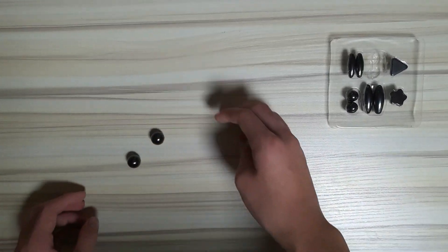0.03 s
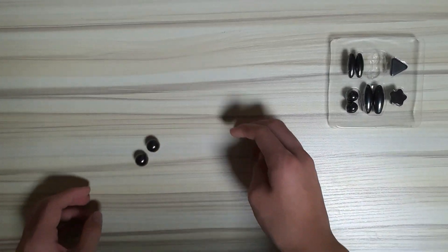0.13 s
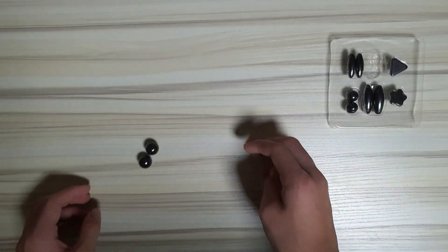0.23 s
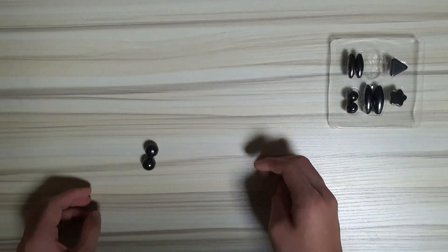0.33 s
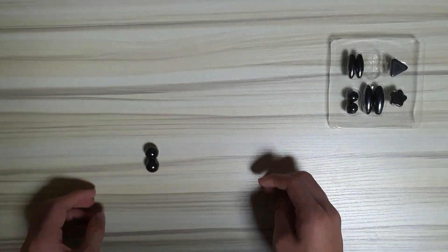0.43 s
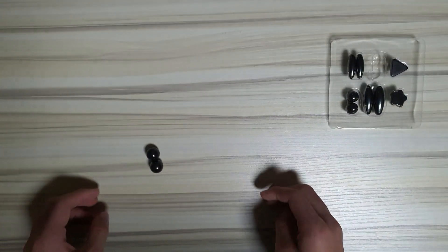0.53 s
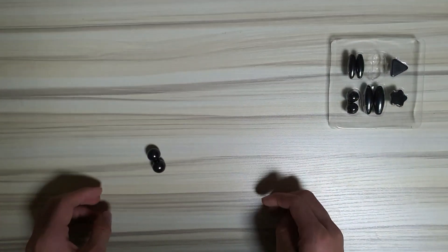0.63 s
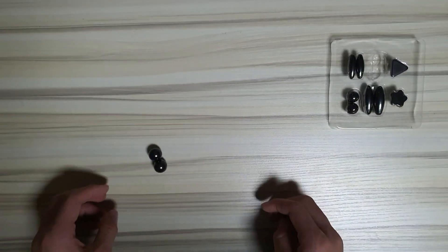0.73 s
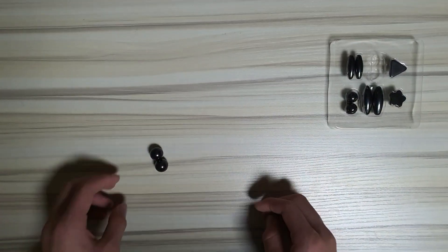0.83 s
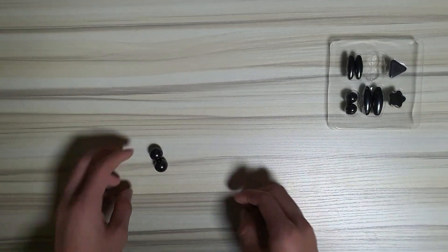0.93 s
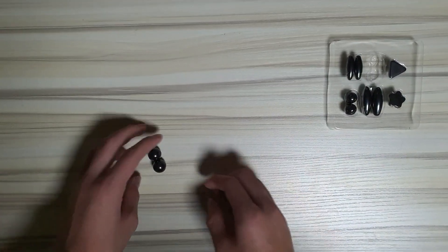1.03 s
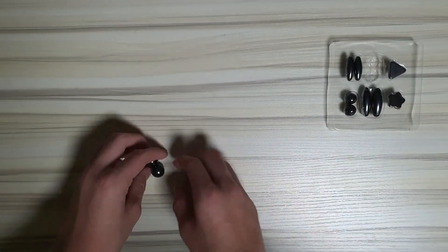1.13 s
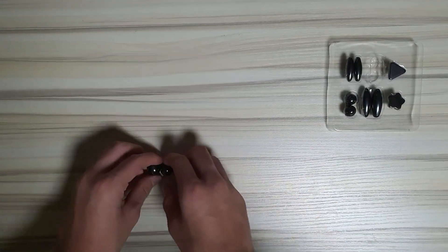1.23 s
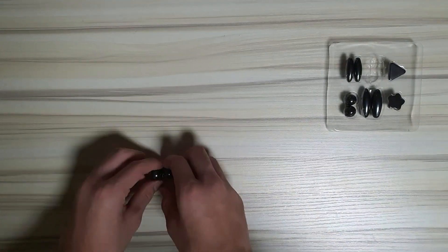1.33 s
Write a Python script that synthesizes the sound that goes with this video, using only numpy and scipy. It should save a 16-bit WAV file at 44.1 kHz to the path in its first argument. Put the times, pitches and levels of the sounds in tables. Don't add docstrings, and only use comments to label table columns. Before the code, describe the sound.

Magnet rattle on wood, closely heard in a small quiet room: low rolling rumble, crisp clicks accelerating to a buzzing chatter, sudden stop, faint hiss, then soft finger scrape, small ticks and dull knocks.

```python
import sys
import numpy as np
from scipy import signal
from scipy.fft import rfft, irfft
from scipy.io import wavfile

SR = 44100
rng = np.random.default_rng(int(sys.argv[2]) if len(sys.argv) > 2 else 0)


def bounce(signal):
    frames = np.transpose(np.atleast_2d(signal))
    limited = np.clip(frames, -1, 1)
    pcm = np.round(limited * 32767).astype(np.int16)
    wavfile.write(sys.argv[1], SR, pcm)


def magnitude_from_level(level_db):
    exponent = np.asarray(level_db, float) / 20
    return 10 ** exponent


N = 61740
TIME = np.arange(N) / SR

# time in seconds, level in dB.
THUMPS = [
    (.043, -33.5),
    (.168, -40),
    (1.229, -43),
    (1.243, -44),
    (1.3015, -36),
    (1.3065, -40.5),
    (1.3145, -34),
    (1.3205, -37),
    (1.3265, -35.5),
]


def evened(x):
    return x / np.sqrt(np.mean(x ** 2) + 1e-20)


def read(points, hz):
    f, value = np.transpose(points)
    return np.interp(np.log(hz + 1), np.log(f + 1), value)


def follow(curve):
    s, db = np.transpose(curve)
    return magnitude_from_level(np.interp(TIME, s, db))


def colour(x, points):
    hz = np.fft.rfftfreq(N, 1 / SR)
    return irfft(rfft(x) * magnitude_from_level(read(points, hz)), N)


def ring(x, hz, width):
    r = np.exp(-np.pi * width / SR)
    return 2 * signal.lfilter([1 - r], [1, -r * np.exp(2j * np.pi * hz / SR)], x)


def dying_tones(rows, t):
    return sum(magnitude_from_level(db) * np.exp(-np.pi * width * t) * np.sin(2 * np.pi * hz * t) for hz, width, db in rows)


def grit(per_s, spread_db):
    size = magnitude_from_level(spread_db * np.minimum(rng.exponential(1, (2, N)), 5)) * rng.standard_normal((2, N))
    return evened(size * (rng.random((2, N)) < per_s / SR))


def train(rows):
    s, db = np.transpose(rows)
    out = np.zeros(N)
    out[np.round(s * SR).astype(int)] = magnitude_from_level(db)
    return out


def room(x):
    # pitch in Hz, seconds to die by 60 dB.
    decay = [(200, 0.32), (1000, 0.34), (3500, .24), (7500, 0.28), (10000, .28), (12500, 0.16),
             (16000, 0.28)]
    taps = np.zeros((2, SR // 2))
    slots = np.arange(120, SR // 2 - 10, 10)
    at = slots + rng.integers(0, 10, (2, len(slots)))
    np.put_along_axis(taps, at, rng.choice([-1., 1.], at.shape), 1)
    hz, t, z = signal.stft(taps, SR, nperseg=256)
    fade = magnitude_from_level(-60 * t / read(decay, hz)[:, None])
    tail = signal.istft(z * fade, SR, nperseg=256)[1]
    return signal.fftconvolve(x, tail / np.linalg.norm(tail[0]), axes=1)[:, :N]


def hush():
    # pitch in Hz, level in dB.
    spectrum = [(40, -7.5), (200, -8), (600, -18), (1200, -14.5), (2300, -29.5), (3500, -26), (5000, -33),
                (16000, -40.5)]
    level_db = -76.5
    a = rng.standard_normal((2, N))
    return magnitude_from_level(level_db) * evened(colour(a + 0.23 * a[::-1], spectrum))


def fingers():
    # time in seconds, level in dB.
    slide = [(1.12, -100), (1.192, -91.5), (1.23, -50), (1.244, -50.5), (1.292, -59.5), (1.322, -60.5),
             (1.346, -69.5), (1.4, -83)]
    # pitch in Hz, level in dB.
    skin = [(880, -28), (1500, -20), (1920, 2), (3090, 6.5), (3590, -1.5), (4590, -1.5), (7540, -4),
            (13000, -26)]
    slips_per_s, level_db, start_s = 2500, 3.5, 1.12
    slips = grit(slips_per_s, 2.5) + .9 * rng.standard_normal((2, N))
    slips = slips + 0.084 * slips[::-1]
    rub = evened(colour(slips, [(300, -29.5)] + list(skin)))
    return magnitude_from_level(level_db) * rub * follow(slide) * (TIME > start_s)


def grip():
    # time in seconds, level in dB.
    chatter = [
        (1.2288, -43),
        (1.2365, -43),
        (1.2445, -43),
        (1.2525, -45),
        (1.314, -44),
        (1.3205, -46),
    ]
    # pitch in Hz, width in Hz, level in dB.
    tick_tones = [(2200, 500, -3), (3100, 500, -4), (4600, 300, 0), (7000, 900, -7)]
    # pitch in Hz, width in Hz, level in dB.
    rap_tones = [(450, 350, -3.5), (900, 360, -3), (1510, 460, -9)]
    t = np.arange(2000) / SR
    thud = dying_tones([(84.7, 40, -12.5)], t)
    ticks = signal.oaconvolve(train(chatter), dying_tones(tick_tones, t))[:N]
    knocks = signal.oaconvolve(train(THUMPS[-5:]), thud + dying_tones(rap_tones, t))[:N]
    return ticks + room(ticks[None]) + knocks


def rolling_bumps(tracks):
    bumps_per_s, spread_db, smooth = 1500, 1.5, 1.2
    bumps = grit(bumps_per_s, spread_db)[:tracks]
    return evened(bumps + smooth * rng.standard_normal((tracks, N)))


def table(s, db):
    # pitch in Hz, width in Hz, level in dB, left-right phase in radians.
    top_modes = [(201, 7, -10, .1), (278, 22, -3, .2), (325, 25, -4, .2), (370, 28, -7, .2),
                 (523, 20, -4, .3), (556, 14, -8, .3), (690, 40, -10, .5), (780, 30, -10, .6),
                 (966, 26, 5, 1.9), (1275, 26, -6, 2.2), (1505, 28, -3, 1.4), (1800, 70, -13, .8),
                 (2150, 100, -11, .4), (2600, 200, -12, .3)]
    # dB rolling in, coming to rest, settled, carried off.
    spots = [(-12, 1, 7, -8), (-6.5, -2, -5.5, 3), (3.5, -4, -10.5, 2), (5.5, -1, -8, 3),
             (11.5, -5, -2.5, -1), (5.5, 2.5, 6, 10.5), (8.5, -5.8, -5.5, -0.5), (6.7, -8, -2.5, 5.5),
             (1, -7, -11, -2.5), (11.5, .1, -1, 8), (2.5, 11.5, -10, 3.2), (-10, 1.8, -2, -21),
             (-1.5, 12, -6.5, 0.3), (-11, 15, -6, 1.5)]
    moves_s = [
        .17,
        .23,
        .59,
        .635,
        .69,
        1.1,
        1.2,
    ]
    # time in seconds, level in dB.
    roll = [(0, -41.5), (.12, -41.5), (.2, -32.5), (.235, -28.5), (.46, -26.5), (.55, -31.5), (.65, -27.5),
            (.69, -47.5), (.78, -69), (.9, -83), (1.1, -89), (1.13, -76.5), (1.2, -57.5), (1.227, -57),
            (1.229, -42.5), (1.278, -46.5), (1.318, -32), (1.345, -39), (1.4, -41)]
    # pitch in Hz, level in dB.
    wood = [(40, -32), (170, -31.5), (230, -19), (1000, -20.5), (2000, -18), (3500, -39), (8000, -50.5),
            (16000, -70.5)]
    # pitch in Hz, likeness of left and right from 0 to 1.
    likeness = [(150, 1), (300, 0.92), (700, 0.55), (1300, 0.22), (3000, 0.41)]
    knock_db, wood_db, room_db, table_db = -24, -4.5, -2, -4.5
    thump_s = 0.000082

    level = follow(roll)
    knocks = np.zeros(N)
    knocks[np.round(s * SR).astype(int)] = magnitude_from_level(db + knock_db) * 10
    u = np.arange(100) / SR / thump_s
    knocks += magnitude_from_level(15) * signal.oaconvolve(train(THUMPS), u * np.exp(-u))[:N]

    modes = np.zeros((2, N))
    for (hz, width, mode_db, turn), (in_db, rest_db, settled_db, off_db) in zip(top_modes, spots):
        path_db = [in_db, 0, 0, rest_db, settled_db, settled_db, off_db]
        gain = magnitude_from_level(np.interp(TIME, moves_s, path_db) + mode_db) * np.sqrt(SR / (20 * width))
        bumps = rolling_bumps(1)[0]
        z = ring(bumps * level + knocks, hz, width) * gain
        modes += np.array([z * np.exp(.5j * turn), z * np.exp(-.5j * turn)]).real
    band = signal.butter(2, [175, 3000], "band", fs=SR, output="sos")
    modes = signal.sosfilt(band, modes)

    a, b = rolling_bumps(2)
    same = np.clip(read(likeness, np.fft.rfftfreq(N, 1 / SR)), 0, 1)
    left = a * level
    right = irfft(same * rfft(left) + np.sqrt(1 - same ** 2) * rfft(b * level), N)
    rumble = colour(np.array([left, right]), wood) / np.std(colour(a, wood))
    sound = modes + magnitude_from_level(wood_db) * rumble
    wet = room(sound.mean(0)[None])
    wet = (wet + .8 * wet[::-1]) / 2
    side_gain = magnitude_from_level(np.array([[-1], [1.]]))
    return magnitude_from_level(table_db) * side_gain * (sound + magnitude_from_level(room_db) * wet)


def bounces():
    # time in seconds, strength in dB.
    single = [(.2304, -4), (.2653, -3), (.2923, -3), (.3114, -4), (.3277, -6), (.3426, -5), (.3550, -6),
              (.3661, -2), (.3771, -4), (.3872, -5), (.3956, -5), (.4043, -4), (.4117, -5), (.4194, -5),
              (.4273, -5), (.4338, -4), (.4408, -6), (.4479, -6), (.4540, -5), (.4601, -7), (.4664, -7),
              (.4718, -7), (.4777, -8), (.4835, -8), (.4884, -8), (.4934, -8), (.4984, -9), (.5033, -9),
              (.5079, -9), (.5125, -10)]
    first_gap_s, shrink, wobble = .00435, .982, .04
    buzz_db, loss_db, scatter_db = -10, -0.0407, 1
    stick_s, stick_db_per_s = 0.63, -250
    s, db = np.transpose(single)
    k = np.arange(70)
    chance = rng.standard_normal((70, 2))
    gaps = first_gap_s * shrink ** k * (1 + wobble * chance[:, 0])
    more = s[-1] + np.cumsum(gaps)
    more_db = buzz_db + loss_db * k + scatter_db * chance[:, 1]
    more_db = more_db + stick_db_per_s * np.maximum(more - stick_s, 0)
    return np.r_[s, more], np.r_[db, more_db]


def dip(x):
    # time in seconds, pitch of the cancelled band in Hz.
    path = [(.23, 3900), (.3, 4070), (.34, 4100), (.38, 4350), (.43, 4300), (.49, 4450), (.55, 4550),
            (.6, 4750), (.66, 4700), (.7, 3750), (.8, 3700)]
    width_hz, depth = 300, 1
    hz = np.interp(TIME, *np.transpose(path))
    turn = np.exp(2j * np.pi * np.cumsum(hz) / SR)
    r = np.exp(-np.pi * width_hz / SR)
    band = 2 * (turn * signal.lfilter([1 - r], [1, -r], x / turn)).real
    return x - depth * band


def rattle(s, db):
    # pitch in Hz, width in Hz.
    click = [(3500, 1100), (4700, 1200), (5700, 900), (6900, 800), (7950, 700), (9300, 1000), (10100, 1100),
             (11800, 1200), (13000, 1400), (14400, 1500), (15500, 1100)]
    # dB at the start, dB in the buzz, left over right in dB.
    click_mix = [(-4.5, -7.5, 0.5), (-6, -9, -7), (-5.5, -12, 5.5), (5.5, -4, -2), (2, -1.5, -3.5),
                 (1.5, -15, -4), (1, -7, 2), (2.5, -1.5, -0.5), (-4.5, -8, 11), (-2.5, -7.5, -11),
                 (-5.5, -16, 0)]
    # delay in ms, left level in dB, right level in dB.
    echoes = [(0, -13.5, 1.5), (0.4367, -15, -2.5), (1.305, -1, -12), (2.6, -21.5, -27.5),
              (5.666, -14, -22), (6.303, 1, -11.5), (7.444, -6, -10), (8.85, -13.5, -19), (11.64, -16, -15),
              (16.2, -6.5, -15), (16.02, -7, -22), (17.6, -22, -15), (19, -14.5, -4.5), (22.06, -5.5, -19)]
    room_db = [
        [3],
        [-3.5],
    ]
    click_db, detune = 9, .008
    turning = .25
    oppose = 2.1

    hz, width, start_db, buzz_db, lean_db = np.c_[click, click_mix].T[:, :, None]
    length = 200
    t = np.arange(length) / SR
    near, direct = np.zeros((2, N)), np.zeros((2, N))
    shape = (len(s), len(echoes), 2, len(click), 1)
    phase = rng.uniform(0, 2 * np.pi, shape[1:]) + turning * np.cumsum(rng.standard_normal(shape), 0)
    phase[:, :3, 0] = phase[:, :3, 1] + oppose * (hz > 5000)
    tune = 1 + detune * rng.standard_normal((len(s), len(click), 1))
    side_gain = magnitude_from_level([lean_db / 2, -lean_db / 2])
    buzz_share = np.clip((s - s[0]) / 0.32, 0, 1)
    for n, mix in enumerate(buzz_share):
        tone_db = start_db + mix * (buzz_db - start_db)
        size = magnitude_from_level(click_db + db[n] + tone_db) * np.sqrt(width / 1e3) / 3
        tones = np.exp(-np.pi * width * t) * np.sin(2 * np.pi * hz * tune[n] * t + phase[n])
        ticks = (size * side_gain * tones).sum(2)
        ticks *= np.minimum(t / .00018, 1)
        for tick, (ms, *side_db) in zip(ticks, echoes):
            i = round((s[n] + ms / 1e3) * SR)
            near[:, i:i + length] += tick * magnitude_from_level(np.array(side_db))[:, None]
        i = round(s[n] * SR)
        direct[:, i:i + length] += ticks[0]
    heard = near + magnitude_from_level(np.array(room_db)) * room(direct)
    no_bass = signal.butter(2, 2500, "high", fs=SR, output="sos")
    return signal.sosfilt(no_bass, dip(dip(heard)))


def scene():
    s, db = bounces()
    return rattle(s, db) + table(s, db) + fingers() + grip() + hush()


def roll_off(x):
    return signal.sosfilt(signal.butter(12, 17150, fs=SR, output="sos"), x)


def record(dry):
    top_hz = 15800
    soft = np.pad(np.tanh(dry), [(0, 0), (127, 127)], "reflect")
    low_pass = signal.firwin(255, top_hz, window=("kaiser", 6), fs=SR)
    mix = signal.oaconvolve(soft, low_pass[None], "valid")
    return roll_off(mix)


dry = scene()
out = record(dry)
bounce(out)
```